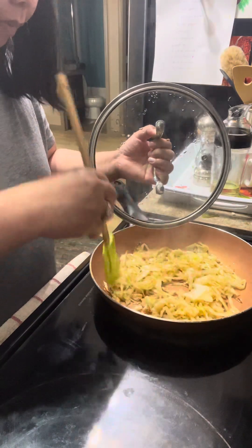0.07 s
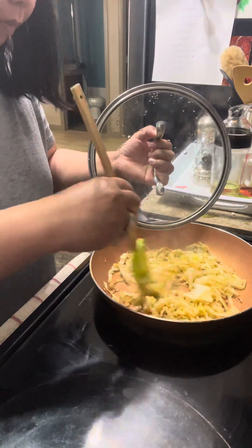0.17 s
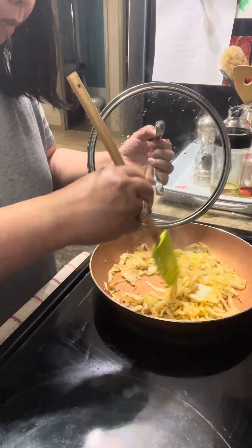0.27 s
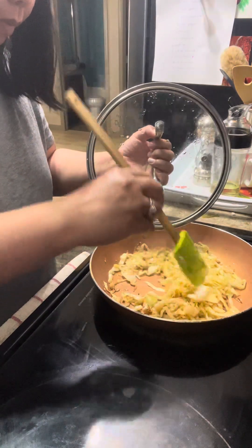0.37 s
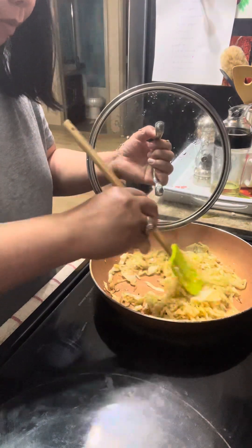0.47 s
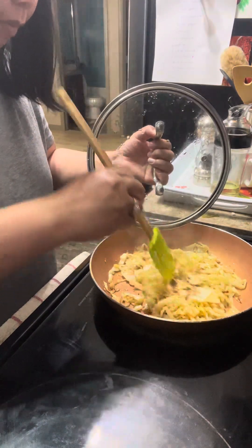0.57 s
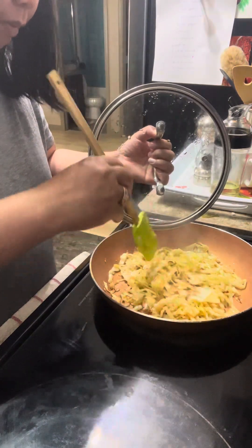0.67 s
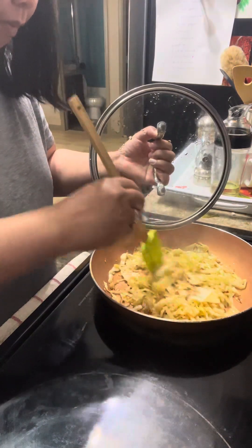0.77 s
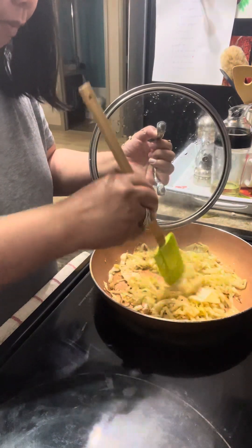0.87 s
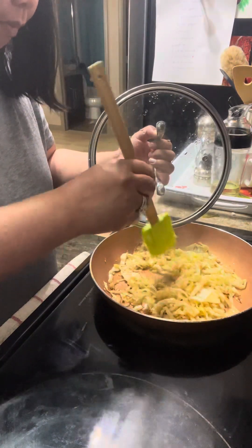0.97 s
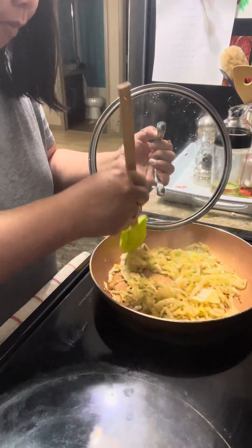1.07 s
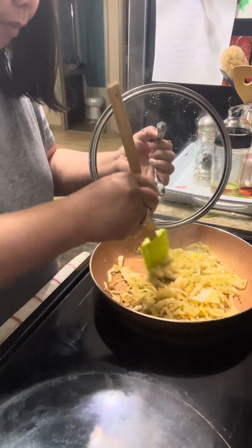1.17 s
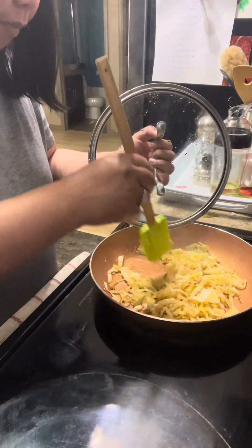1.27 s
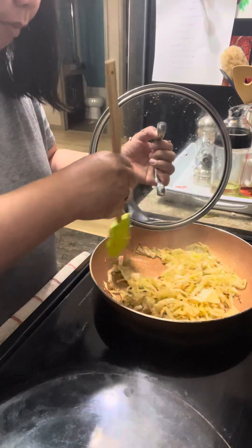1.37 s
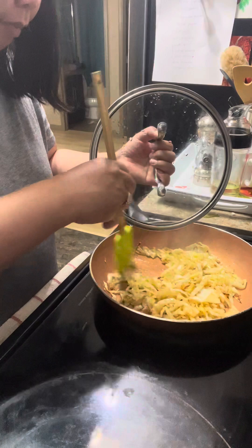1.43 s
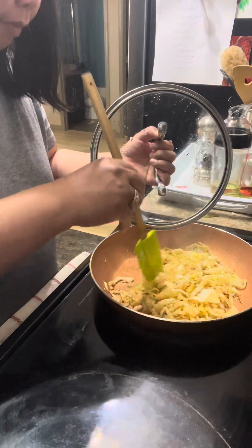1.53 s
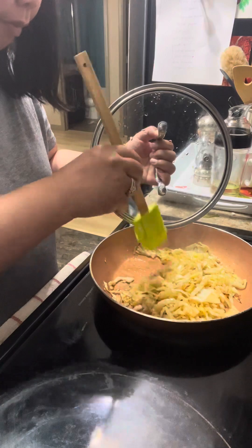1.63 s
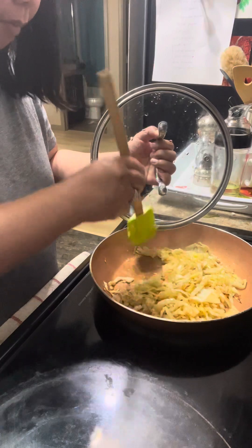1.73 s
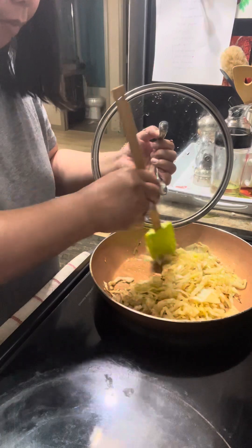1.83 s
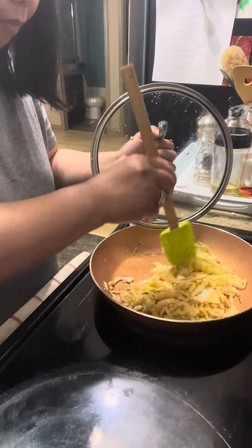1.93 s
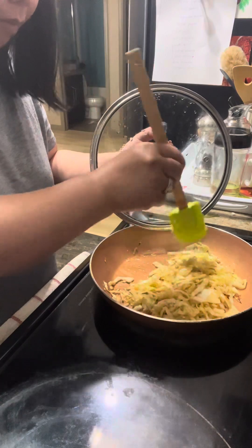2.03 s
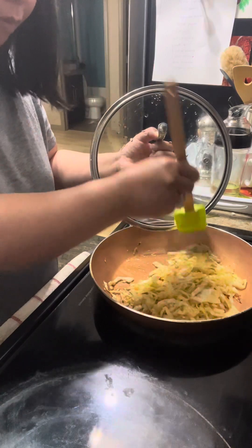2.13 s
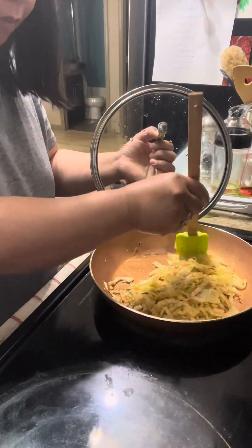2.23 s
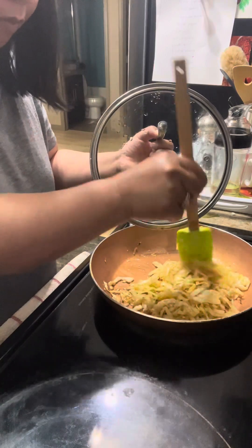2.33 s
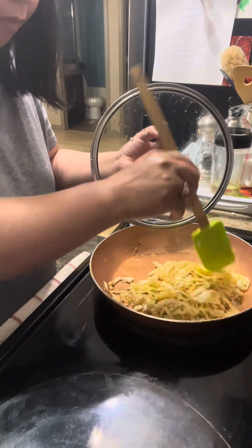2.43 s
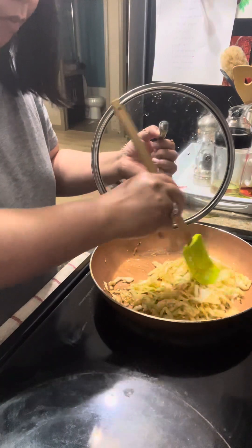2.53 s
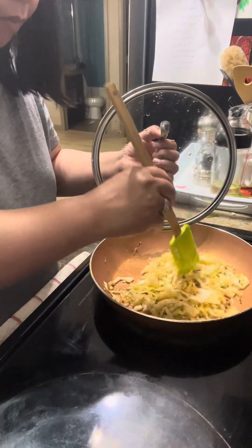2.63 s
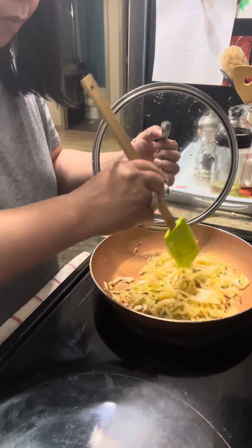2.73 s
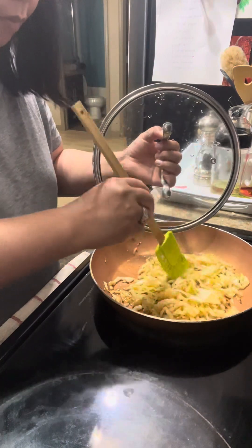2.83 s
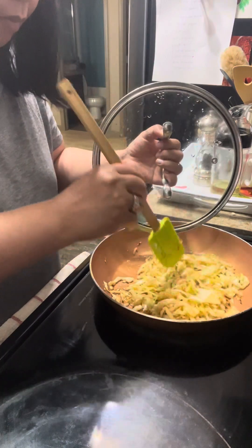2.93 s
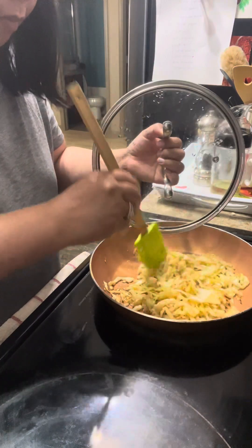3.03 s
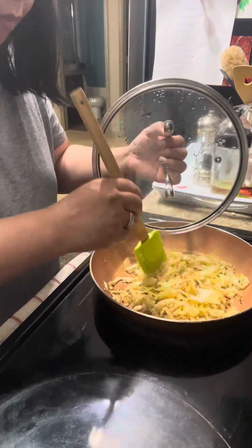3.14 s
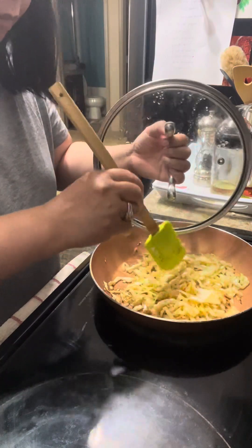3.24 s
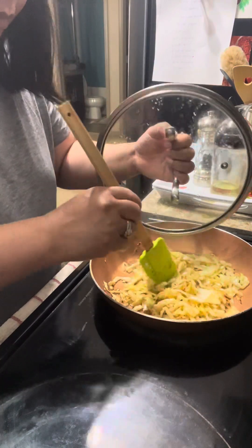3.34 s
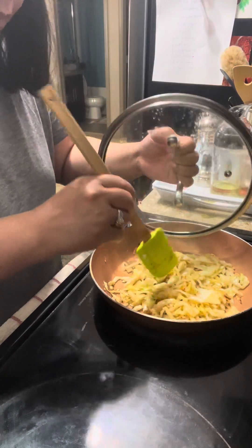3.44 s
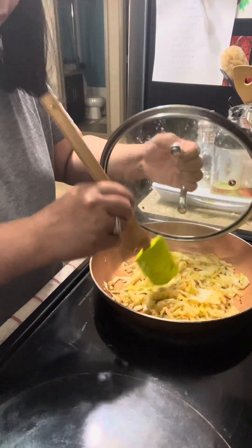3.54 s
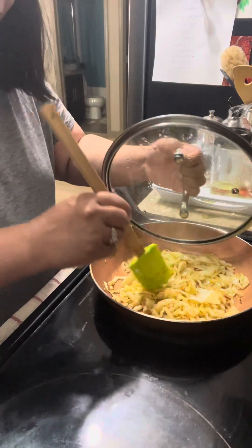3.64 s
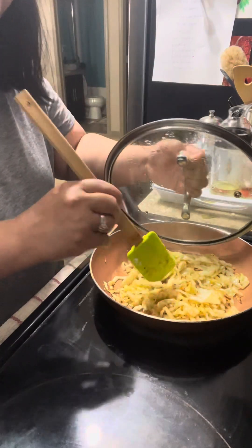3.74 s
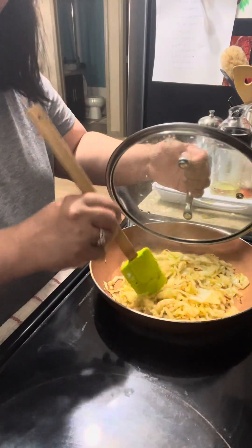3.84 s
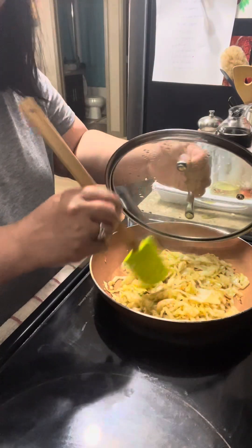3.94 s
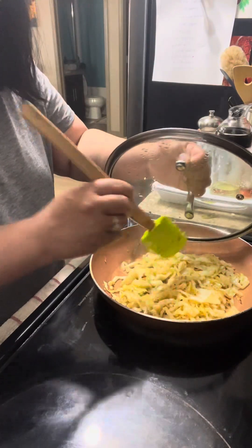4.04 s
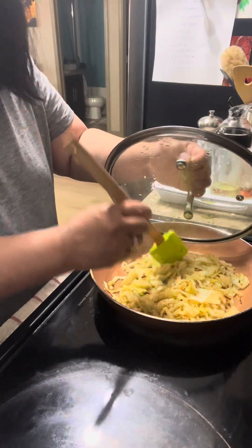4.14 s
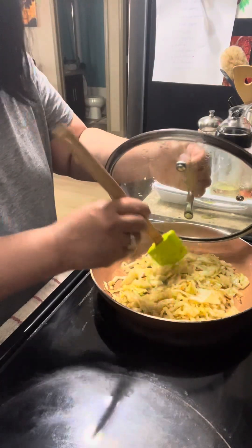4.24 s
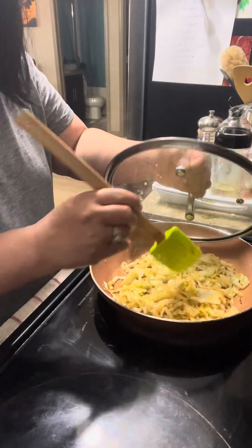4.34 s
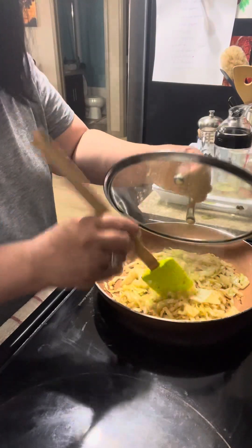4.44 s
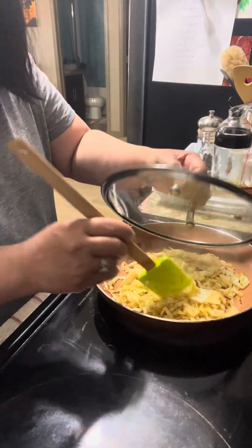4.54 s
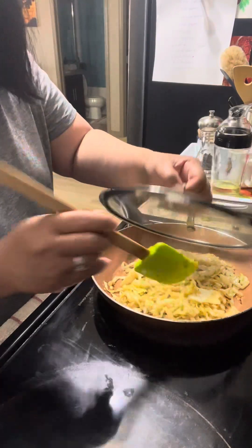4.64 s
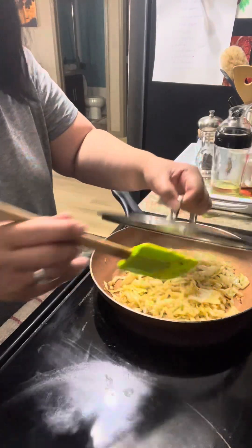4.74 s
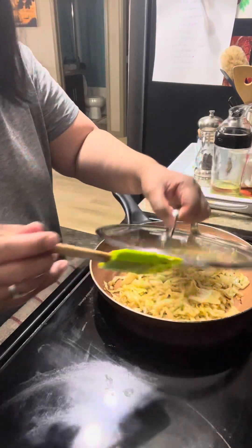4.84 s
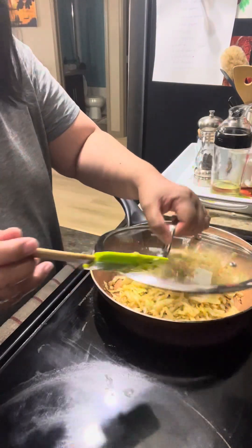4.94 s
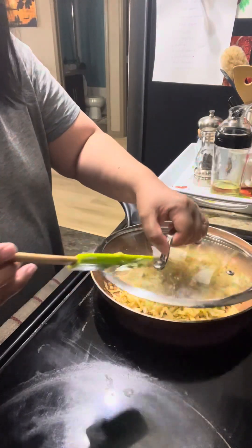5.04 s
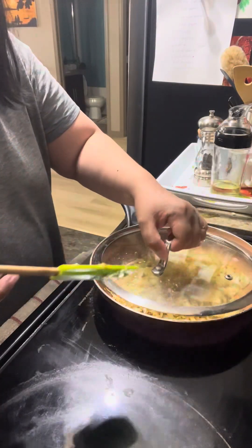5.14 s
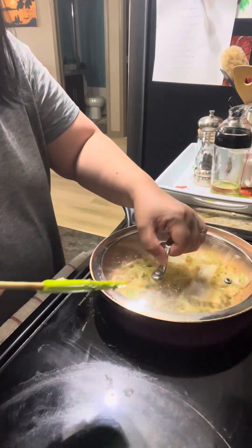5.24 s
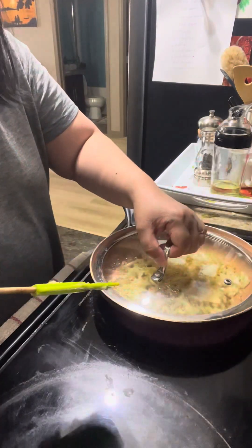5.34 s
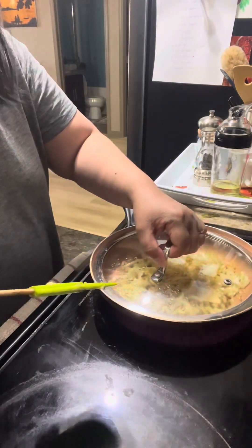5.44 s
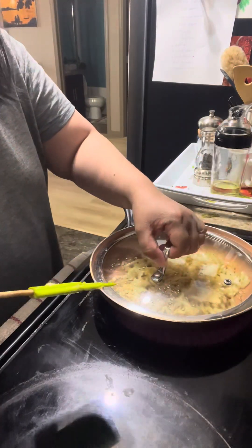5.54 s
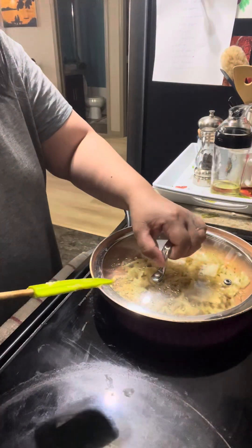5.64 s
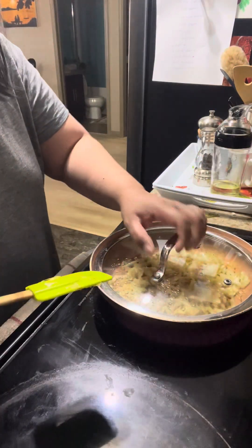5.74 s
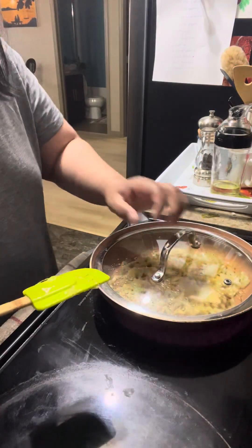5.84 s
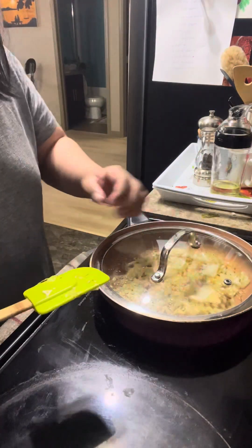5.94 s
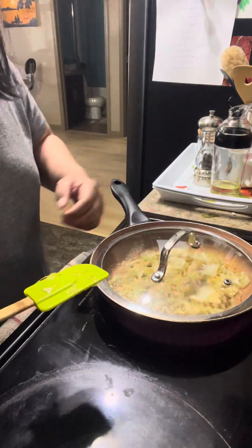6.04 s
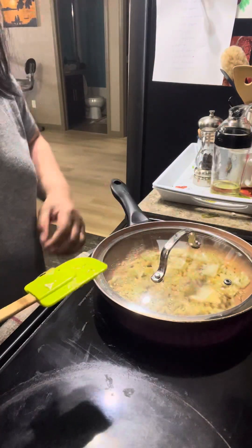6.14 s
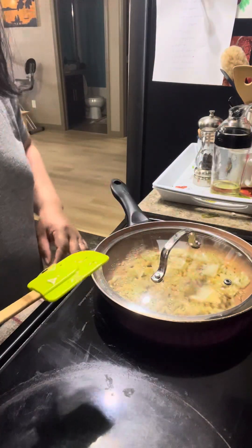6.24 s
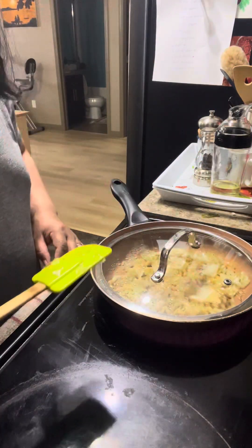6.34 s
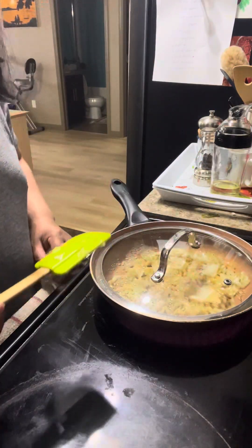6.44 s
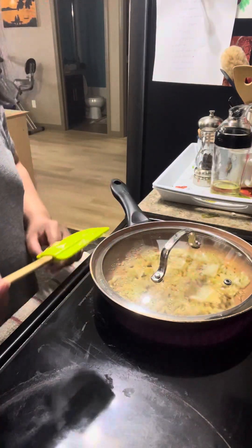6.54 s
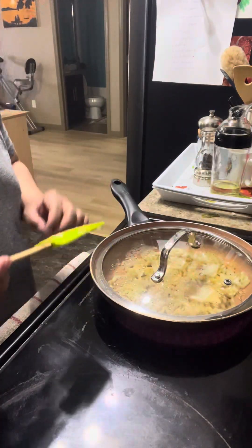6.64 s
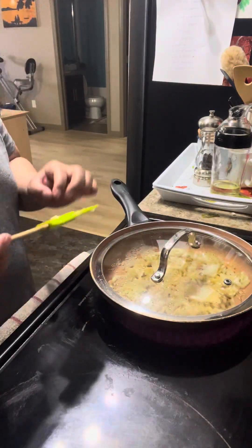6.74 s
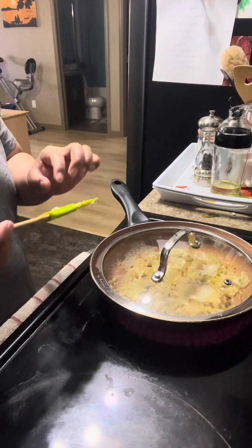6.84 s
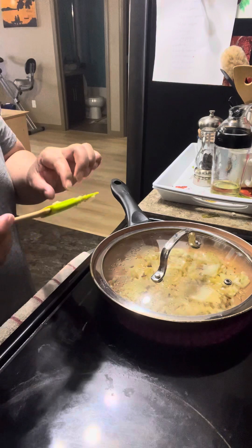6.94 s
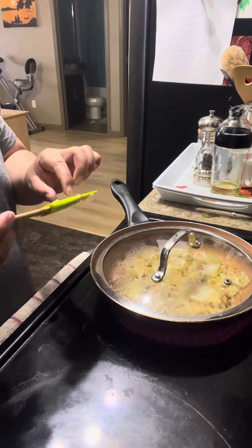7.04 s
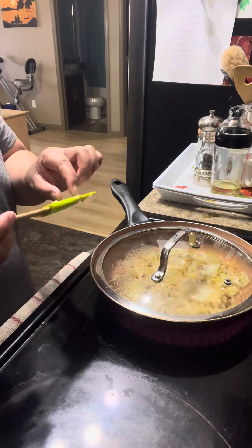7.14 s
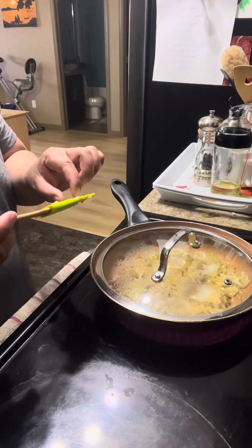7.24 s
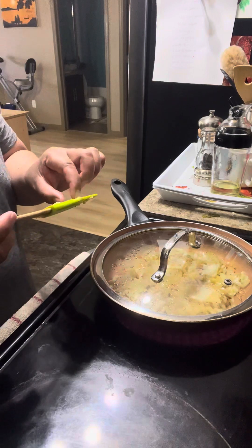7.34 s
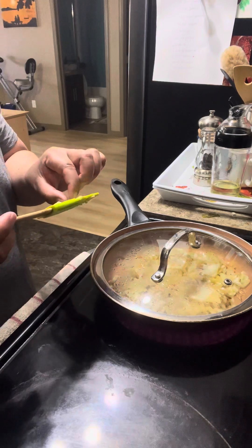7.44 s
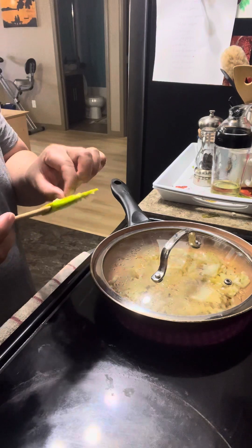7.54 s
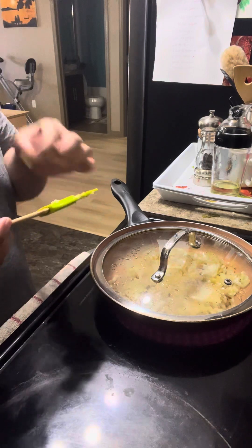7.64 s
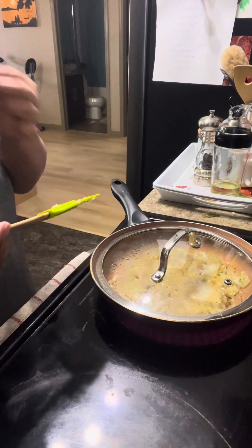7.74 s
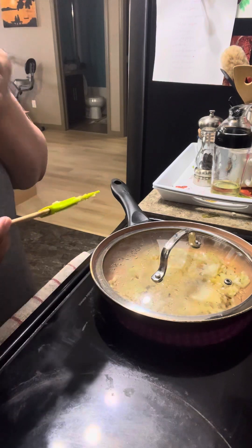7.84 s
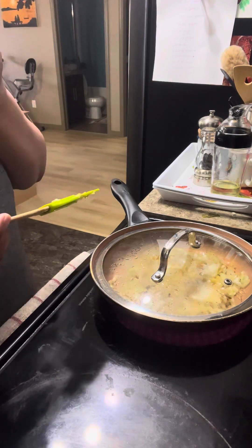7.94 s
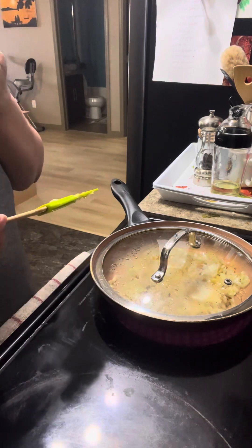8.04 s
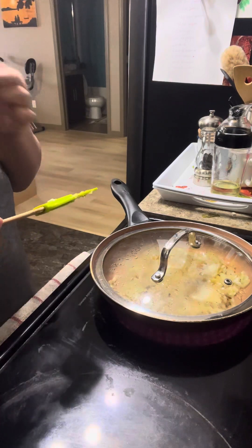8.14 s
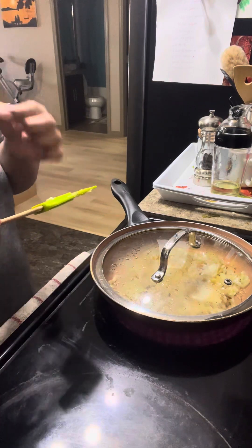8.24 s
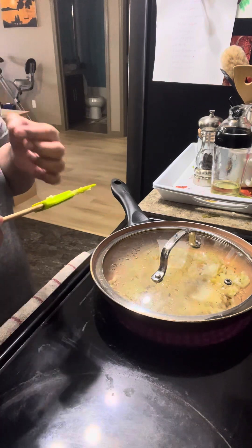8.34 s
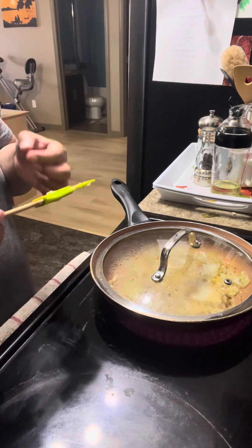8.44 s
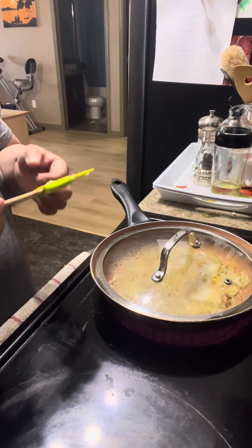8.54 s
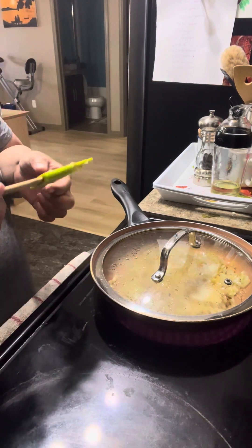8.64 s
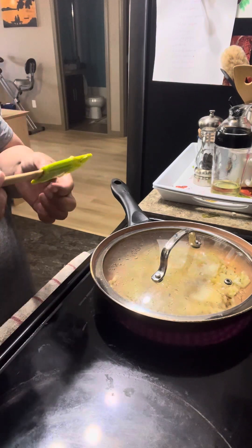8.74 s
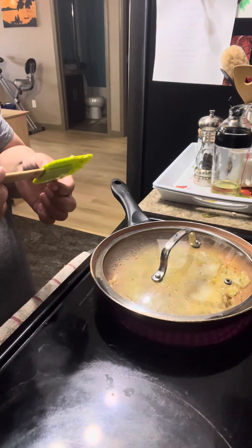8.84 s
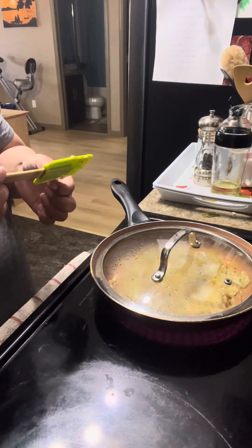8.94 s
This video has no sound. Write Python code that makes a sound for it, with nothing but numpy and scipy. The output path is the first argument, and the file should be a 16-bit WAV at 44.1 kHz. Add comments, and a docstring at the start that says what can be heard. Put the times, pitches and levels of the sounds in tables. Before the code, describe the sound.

From the start, shredded cabbage sizzles loudly in a frying pan, a bright, dense hiss with fine crackling and occasional sharp spits. A silicone spatula pushes it about with faint rubbing and soft bumps near 0.8 and 2.2 seconds, and the sizzle swells slightly with each push, most between 3.3 and 4.8 seconds. The pan takes dull, short knocks at about 3.5, 4.3 and 4.7 seconds. From around 4.8 seconds a glass lid comes down with a few faint clinks; the hiss turns hollow and fades until the lid is shut at 5.6 seconds. A much quieter, muffled sizzle carries on to the end, near 9 seconds, with a few tiny pops, light ticks and soft bumps around 6 to 8.5 seconds. A kitchen fan drones low underneath throughout. Everything is heard close up, in stereo, in a small room.

```python
"""Shredded cabbage sizzles in a frying pan as countless tiny steam bubbles burst in the fat.
A silicone spatula pushes it about, and the sizzle flares where wet cabbage meets hot metal.
Water drops spit and the pan takes a few soft knocks, then a glass lid shuts most of the hiss in.
A kitchen fan drones throughout; two close microphones hear it all in a small room."""
import sys
import numpy as np
from scipy import signal
from scipy.fft import rfft, irfft
from scipy.io import wavfile
from scipy.ndimage import uniform_filter1d

SR = 44100
rng = np.random.default_rng(int(sys.argv[2]) if len(sys.argv) > 2 else 0)


def unload_audio(sound):
    """Save the sound as a 16-bit wav file, at the path given as the first command line argument."""
    columns = np.transpose(np.atleast_2d(sound))
    # keep every value between -1 and 1, then stretch to whole-number steps
    steps = np.round(np.clip(columns, -1, 1) * 32767)
    wavfile.write(sys.argv[1], SR, steps.astype(np.int16))


N = 396900
T, HZ = np.arange(N) / SR, np.fft.rfftfreq(N, 1 / SR)  # time and frequency axes
HISS_LEAK = 1.69  # hiss escapes as this power of the gap under the lid


def gain_of(db):
    """Turns decibels into a factor to multiply by."""
    return np.exp(np.asarray(db) * (np.log(10) / 20))


def fade(t, t60):
    """Dies away by 60 dB in t60 seconds, the fade time."""
    return gain_of(-60 * t / t60)


def evened(x):
    """Scales a signal to an average strength (rms) of 1."""
    return x / np.sqrt(np.mean(x ** 2) + 1e-20)


def read(points, column=1):
    """Joins one column of a table into a curve over all frequencies."""
    table = np.array(points, float)
    return np.interp(np.log(HZ + 1), np.log(table[:, 0]), table[:, column])


def add(mix, s, sound):
    """Mixes a sound in at s seconds."""
    part = mix[max(round(s * SR), 0):][:len(sound)]
    part += sound[:len(part)]


def coloured(x, colour, peaks=()):
    """Gives a sound a smooth tone colour with peaks or dips on top; strength 1."""
    db = read(colour) + sum(lift / (1 + (2 * (HZ - hz) / width) ** 2) for hz, width, lift in peaks)
    return evened(irfft(rfft(x) * gain_of(db), N))


def passed(x, corner_hz, kind):
    """Keeps only the "low" or the "high" side of a frequency; peak 1."""
    y = signal.sosfilt(signal.butter(4, corner_hz, kind, fs=SR, output="sos"), x)
    return y / abs(y).max()


def wander(rate_hz, size=4096):
    """A random drift of strength 1, with little motion faster than the given rate."""
    hz = np.fft.rfftfreq(size, T[-1] / size)
    slow = irfft(rfft(rng.standard_normal(size)) / (1 + (hz / rate_hz) ** 2) * (hz > 1))
    return np.interp(T, np.linspace(0, T[-1], size), evened(slow))


def bursts(per_s, spread_db):
    """Random clicks, as of bursting bubbles: very many small ones, a few large."""
    size = gain_of(spread_db * np.minimum(rng.exponential(1, N), 5))
    return evened(size * rng.choice([-1, 1], N) * (rng.random(N) < per_s / SR))


def echoes(x, t60=0.27, near_t60=0.034, near_db=10, count=4):
    """Echoes off hob, wall and room shift at random as the bubbling moves about the pan."""
    t, out = T[:16384], np.zeros((2, N))
    decay = (fade(t, t60) + gain_of(near_db) * fade(t, near_t60)) * (t > .001)
    paths = rfft(rng.standard_normal((count, 2, len(t))) * decay)
    power = uniform_filter1d((abs(paths) ** 2).mean(0), size=31, axis=1)
    paths /= np.sqrt(power)  # together they favour no pitch
    shares = np.array([wander(rate_hz=13) for _ in range(count)])
    shares[0] += 0.87  # one path is usually the strongest
    shares /= np.linalg.norm(shares, axis=0)
    for share, taps in zip(shares, irfft(paths)[..., :len(t) // 2]):
        out += signal.oaconvolve((x * share)[None], taps, axes=1)[:, :N]
    return out


def kitchen(spread, sharp, sharp_echo_db=-5):
    """Sound reaches the two microphones out of step; sharp sounds in plain view echo less."""
    # (frequency [Hz], how alike left and right sound [0-1], lead of the left side [radians])
    stereo = [(143, 0.99, 0), (377, 0.64, 0), (645, 0.27, -0.4), (990, 0.46, 0.74), (2070, 0.48, -1.3),
              (2610, 0.53, -3), (3310, 0.04, -1.75), (3650, 0.46, 1.1), (4330, 0.69, 0), (4900, 0.57, 0.5),
              (6340, 0.68, 1.06), (7500, 0.6, 2.5), (7660, 1, 3), (9510, 1, 3), (10450, 0.63, 4),
              (11500, 0.3, 6.5), (11950, 0.96, 6.5), (14350, 1, 6), (14800, 0.5, 7), (15900, .55, 8.5)]
    # stereo balance: (frequency [Hz], left over right [dB])
    balance = [(100, -0.5), (350, -1.5), (1300, -0.8), (2100, 3.5), (2800, 0), (3700, 1), (4700, 0.5),
               (8000, 0)]
    alike, sides = np.clip(read(stereo), 0, .999), np.array([[.5], [-.5]])
    common = (np.sqrt(alike) * rfft(spread) + rfft(sharp)) * np.exp(1j * sides * read(stereo, 2))
    reflected = np.sqrt(1 - alike) * rfft(echoes(spread + gain_of(sharp_echo_db) * sharp))
    return irfft((common + reflected) * gain_of(sides * read(balance)), N)


def fan(air_db=-48, hum_db=-58, hum_hz=119, boom_db=-56, boom_hz=165, boom_width_hz=55):
    """A wavering motor hum, gusty rumbling air and a throbbing boom in the duct."""
    # colour of the moving air: (frequency [Hz], level [dB])
    air_colour = [(22, -48), (35, -14), (50, -3.5), (68, -7.5), (88, -9.5), (110, 0.5), (150, -1),
                  (180, -3.5), (220, -11.5), (285, -16.5), (385, -21), (560, -29), (900, -39), (2500, -56)]
    # where the duct rings: (frequency [Hz], width [Hz], lift [dB])
    duct_peaks = [(340, 47, 8.3), (451, 54, 10.4)]
    cycles = np.cumsum(hum_hz + 1.2 * wander(rate_hz=4.9)) / SR
    hum = np.sqrt(2) * np.sin(2 * np.pi * cycles) * gain_of(hum_db + 3 * wander(rate_hz=8.2))
    gusts = gain_of(air_db + 1.56 * wander(rate_hz=12))
    air = gusts * coloured(rng.standard_normal(N), air_colour, duct_peaks)
    boom_band = 1 / (1 + 2j * (HZ - boom_hz) / boom_width_hz) ** 2
    boom = evened(irfft(rfft(rng.standard_normal(N)) * boom_band, N))
    return air + hum + boom * gain_of(boom_db + 4 * wander(rate_hz=8.6))


def clinks():
    """A light touch makes glass or metal ring with one note."""
    # lid and utensils: (time [s], level [dB], pitch [Hz], fade time [s])
    touches = [(2.929, -39.5, 946, 0.041), (4.845, -36.5, 463, 0.091), (5.263, -47, 1655, 0.11),
               (5.285, -50.5, 3380, .22), (5.349, -51.5, 3380, .2), (7.023, -45, 895, 0.023),
               (7.023, -44, 3200, .012), (7.922, -49, 1150, .02)]
    out, t = np.zeros(N), T[:SR // 4]
    for s, db, hz, t60 in touches:
        add(out, s, gain_of(db) * fade(t, t60) * np.sin(2 * np.pi * hz * t))
    return out


def stirring(rise_cycles=0.37, fade_cycles=1.43):
    """Soft bumps that hardly ring, and the low rub of sliding cabbage."""
    # spatula pushes and bumps on the counter: (time [s], level [dB], pitch [Hz])
    pushes = [(.776, -23.5, 147), (.81, -36, 65.5), (.832, -35, 125), (1.485, -40, 60), (2.22, -24.5, 177),
              (2.224, -33, 302), (4.489, -38, 105), (5.955, -35, 159), (7.995, -36, 135), (8.168, -35, 135),
              (8.196, -31, 166)]
    # the pan rocks on the hob after knocks: (time [s], level [dB], pitch [Hz])
    rocks = [(3.4751, -25.5, 166), (3.483, -30, 125), (3.509, -38, 160), (4.327, -25.5, 313),
             (4.341, -36, 95), (4.709, -26.5, 112), (4.7235, -35, 170), (5.275, -39, 149)]
    # cabbage slides, and last the lid on the rim: (time [s], level [dB], half length [s])
    strokes = [(.12, -57, 0.12), (0.816, -50, 0.05), (1.453, -55.5, 0.12), (1.815, -48.5, 0.038),
               (2.95, -52.5, 0.075), (3.608, -50.5, 0.07), (4.476, -47, 0.072), (4.888, -49, 0.069)]
    # colour of the rubbing: (frequency [Hz], level [dB])
    rub_colour = [(25, -15), (50, 3), (150, -2.5), (300, -4.5), (600, -18), (2000, -32), (6000, -60)]
    out, t = np.zeros(N), np.arange(-2000, 4000) / SR  # a bump's swell peaks at t = 0
    for s, db, hz in pushes + rocks:
        cycles = t * hz
        swell = np.exp(-np.where(cycles < 0, (cycles / rise_cycles) ** 2 / 2, cycles / fade_cycles))
        add(out, s + t[0], gain_of(db) * swell * np.sin(2 * np.pi * cycles))
    rub_level = sum(gain_of(db) * np.exp(-((T - s) / half) ** 2 / 2) for s, db, half in strokes)
    return out + rub_level * coloured(bursts(per_s=900, spread_db=3), rub_colour)


def knocks(slap_low_hz=420, thud_hz=540, rattle_db=-2.5, rattle_t60=0.15):
    """A slap rings the pan's higher notes, then the weight lands with a dull thud; both rattle."""
    # (time [s], level [dB], treble limit [Hz], thud delay [s], thud over slap [dB])
    hits = [(3.462, -28, 2200, 0.0071, 0), (4.307, -26.5, 1900, .007, 0), (4.44, -38, 1300, .014, 0),
            (4.68, -22.5, 1100, 0.00897, -.5), (5.264, -40, 1100, .007, 0)]
    # notes of pan and hob: (pitch [Hz], level [dB], fade time [s])
    notes = [(124, -10, 0.064), (225, -6, 0.065), (332, -3.5, 0.079), (440, -3, 0.07), (640, -3.5, 0.038),
             (764, -4.5, 0.032), (910, -8, 0.033), (1208, -4, 0.05), (1440, -8, 0.028), (1787, -1, 0.039)]
    out, t = np.zeros(N), T[:8192]
    ring = sum((-1) ** k * gain_of(db) * fade(t, t60) * np.sin(2 * np.pi * hz * t)
               for k, (hz, db, t60) in enumerate(notes))
    for s, db, corner_hz, after_s, thud_db in hits:
        rattle = rng.standard_normal(len(t)) * fade(t, rattle_t60)
        rattle /= np.linalg.norm(rattle)
        knock = ring + gain_of(rattle_db) * signal.fftconvolve(ring, rattle)[:len(t)]
        slap = passed(passed(knock, slap_low_hz, "high"), corner_hz, "low")
        add(out, s, gain_of(db) * slap)
        add(out, s + after_s, gain_of(db + thud_db) * passed(knock, thud_hz, "low"))
    return out


def lid_cover(near_s=4.57, over_s=4.77):
    """How far the lid has swung over the pan: 0 aside, 1 right above."""
    return np.clip((T - near_s) / (over_s - near_s), 0, 1)


def rim_gap(closing_s=4.83, shut_s=5.60):
    """Width of the opening under the lid: 1 open, 0 shut."""
    return np.clip((shut_s - T) / (shut_s - closing_s), 0, 1)


def lid_ring(level_db=-47.8, glide=.05):
    """The sizzle rings the air under the lid; the pitch sinks as the opening narrows."""
    # notes of that hollow: (pitch [Hz], width [Hz], level [dB])
    notes = [(450, 40, 6), (716, 98, -4), (921, 22, -2), (1167, 100, 5.5), (2280, 85, 8), (2860, 60, -10),
             (3400, 70, 4), (4200, 270, 1)]
    response = sum(gain_of(db) / (1 + 1.3j * (HZ - hz) / width) ** 2 for hz, width, db in notes)
    ring = evened(irfft(rfft(rng.standard_normal(N)) * response, N))
    play_speed = 1 + glide * (rim_gap() - .5)
    sinking = np.interp(np.cumsum(play_speed) / SR, T, ring)
    return gain_of(level_db) * lid_cover() * rim_gap() * sinking


def spits(trim_db=-3.9, pitch_hz=13500, width_hz=4200, spray_db=-20, spray_t60=0.067, rise_s=.001):
    """A drop of water bursts in the fat: a very short bright crack, then a brief spray."""
    # the late ones are under the lid: (time [s], level before trim [dB], fade time [s])
    drops = [(.843, -12, .008), (1.964, -19, .006), (2.440, -17, .005), (2.812, -21, .02),
             (2.899, -15.5, .014), (3.330, -14, .014), (3.510, -19.5, .008), (3.617, -15, .008),
             (4.404, -17, 0.018), (4.725, -14, .012), (4.892, -12.5, .014), (4.930, -20.5, .01),
             (4.977, -20, .012), (5.082, -19, .01), (5.236, -30, .006), (5.498, -35, .008),
             (5.555, -37, .008), (7.558, -32, .006), (8.184, -33, .024), (8.506, -35.5, .007)]
    out, t = np.zeros(N), T[:4096]
    band = 1 / (1 + 1j * (np.fft.rfftfreq(len(t), 1 / SR) - pitch_hz) / width_hz) ** 2
    for s, db, t60 in drops:
        shape = (1 - np.exp(-t / rise_s)) * (fade(t, t60) + gain_of(spray_db) * fade(t, spray_t60))
        crack = irfft(rfft(rng.standard_normal(len(t))) * band) * shape
        add(out, s, gain_of(db + trim_db) * crack / abs(crack).max())
    return out


def flare_db(rise_s=0.029, fall_s=0.045):
    """The sizzle flares while wet cabbage is pressed on hot metal, and sinks as the water boils off."""
    # spatula presses: (start [s], lift [dB], time held [s])
    presses = [(.06, 1.5, 0.14), (.37, 1.1, 0.43), (.82, 1, 0.042), (1.52, 1, .08), (2.25, 2.3, 0.076),
               (2.47, 1.1, 0.086), (2.78, 1.3, 0.16), (3.33, 2, 0.6), (3.5, 0.7, 0.1), (3.81, 1.3, 0.057),
               (4.09, 1.5, 0.78), (4.36, 2, 0.1)]
    lift = np.zeros(N)
    for s, db, held in presses:
        rise = 1 - np.exp(-np.maximum(T - s, 0) / rise_s)
        fall = np.exp(-np.maximum(T - s - held, 0) / fall_s)
        lift += db * rise * fall
    return lift


def crackle(level_db=-47, low_hz=3200, high_hz=7000, t60=0.0022, sizes=8):
    """Larger bubbles crack, each size at its own pitch; flares lift them and the lid shuts them in."""
    cracks, t = np.zeros(N), T[:512]
    for hz in np.geomspace(low_hz, high_hz, sizes):
        ping = fade(t, t60) * np.sin(2 * np.pi * hz * t)
        cracks += signal.oaconvolve(bursts(per_s=100, spread_db=2.4), ping)[:N]
    return gain_of(level_db + flare_db()) * rim_gap() ** HISS_LEAK * evened(cracks)


def frying(fizz_per_s, snaps_per_s, snap_db, snap_hz, flutter_db):
    """A dense fizz of bubbles and fewer bright snaps; each comes in its own flurries."""
    fizz = bursts(fizz_per_s, spread_db=2.5) * gain_of(flutter_db * wander(rate_hz=31))
    treble = HZ ** 2 / (HZ ** 2 + snap_hz ** 2)
    snaps = irfft(rfft(bursts(snaps_per_s, spread_db=3)) * treble, N)
    flurry_db = 2.5 * wander(rate_hz=22) + 2.5 * wander(rate_hz=5)
    return fizz + gain_of(snap_db + flurry_db) * evened(snaps)


def muffled_sizzle(level_db=-50):
    """The soft part of the sizzle, which no lid shuts in."""
    # colour of the lidded pan: (frequency [Hz], level [dB])
    colour = [(250, -25), (550, -6.5), (900, -3), (1150, -5.5), (1340, -11), (1600, -4.5), (2600, -2),
              (4600, -1.5), (6200, -0.8), (7800, -2.5), (9000, -2), (11300, -7), (13000, -3.5),
              (15700, -11.5), (17000, -25)]
    # where it rings: (frequency [Hz], width [Hz], lift [dB])
    peaks = [(795, 86, 8.2), (1130, 105, 3.2), (1520, 120, 4.5), (2040, 97, 7.5), (2310, 190, 3.4),
             (2900, 340, 5.5), (4120, 220, 2.5), (5500, 250, -2), (5950, 260, 3.5), (6350, 300, 2.5)]
    hiss = frying(fizz_per_s=20000, snaps_per_s=650, snap_db=-7, snap_hz=12000, flutter_db=0.5)
    return gain_of(level_db) * coloured(hiss, colour, peaks)


def open_sizzle(level_db=-34, sag_db=-1, sag_s=2.86, sag_width_s=0.15):
    """The full sizzle swells in each flare, then turns hollow and fades as the lid shuts it in."""
    # colour of the open pan: (frequency [Hz], level [dB])
    colour = [(150, -26), (400, -13.5), (620, -19), (1100, -18), (1700, -12), (2200, -7), (2900, -2.5),
              (3500, -0.5), (5000, 0), (7000, 0.26), (8000, -3), (9000, -3.5), (11300, -5.5), (12500, -1.3),
              (13800, 0), (15000, -4.5), (17000, -8.5)]
    # where it rings: (frequency [Hz], width [Hz], lift [dB])
    peaks = [(773, 145, 7.6), (917, 42, 10), (1030, 96, -6), (1180, 235, 10), (1805, 59, 3.5),
             (2030, 400, 5), (2910, 140, 2.5), (3670, 160, 2.5), (5400, 110, 1.5)]
    # dips where the lid's echo cancels the hiss: (frequency [Hz], width [Hz], lift [dB])
    lid_dips = [(1450, 250, -2.5), (1900, 200, -1.5), (2400, 120, -7), (3220, 160, -2), (6200, 2200, -1.5)]
    # the sizzle sags slightly for a moment
    swell_db = flare_db() + sag_db * np.exp(-((T - sag_s) / sag_width_s) ** 2 / 2)
    gap, cover = rim_gap(), lid_cover()
    # snaps gain more from a flare than the fizz does, and lose more to the closing lid
    snap_db = -7.5 + 0.37 * swell_db - 4 * (1 - gap) ** 2
    hiss = frying(fizz_per_s=16000, snaps_per_s=1400, snap_db=snap_db, snap_hz=11000, flutter_db=0.52)
    level = gain_of(level_db + swell_db + 0.25 * wander(rate_hz=12))
    free, covered = coloured(hiss, colour, peaks), coloured(hiss, colour, peaks + lid_dips)
    return level * gap ** HISS_LEAK * ((1 - cover) * free + cover * covered)


def scene():
    """Everything on the hob, heard in the kitchen."""
    spread = open_sizzle() + muffled_sizzle() + lid_ring() + fan()
    sharp = crackle() + spits() + knocks() + clinks() + stirring()
    return kitchen(spread, sharp)


def record(dry):
    """Cuts off the very highest treble."""
    treble_cut = signal.firwin(511, 15900, window=("kaiser", 9), fs=SR)  # edge at 15900 Hz
    return signal.oaconvolve(dry, treble_cut[None], "same")


dry = scene()
out = record(dry)
unload_audio(out)
```